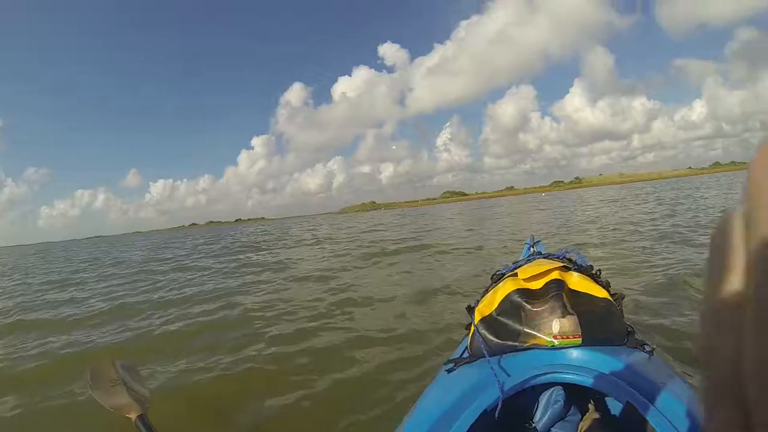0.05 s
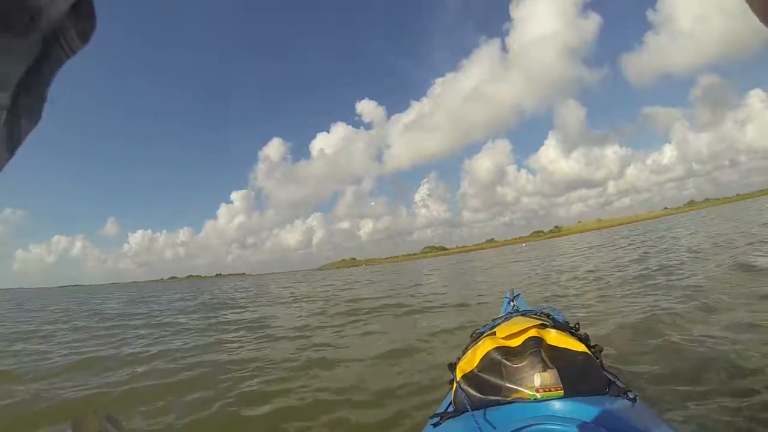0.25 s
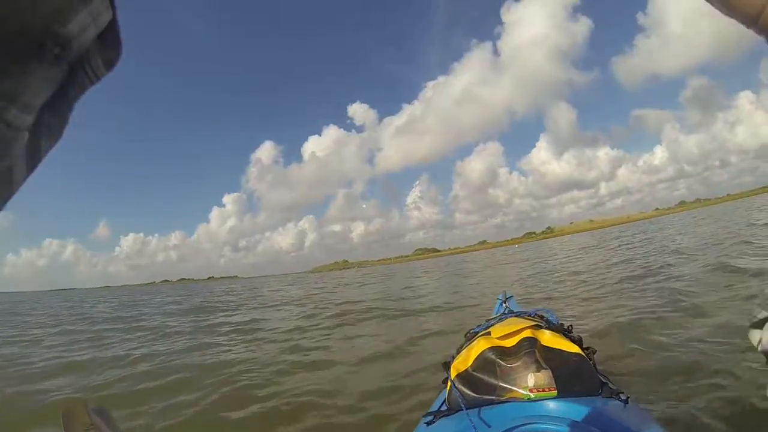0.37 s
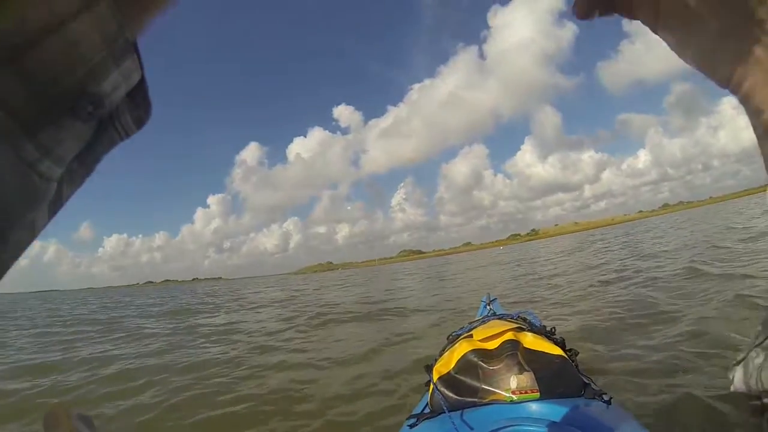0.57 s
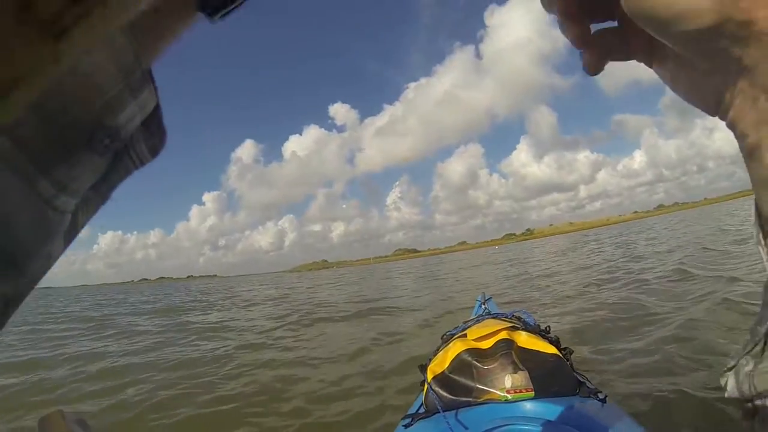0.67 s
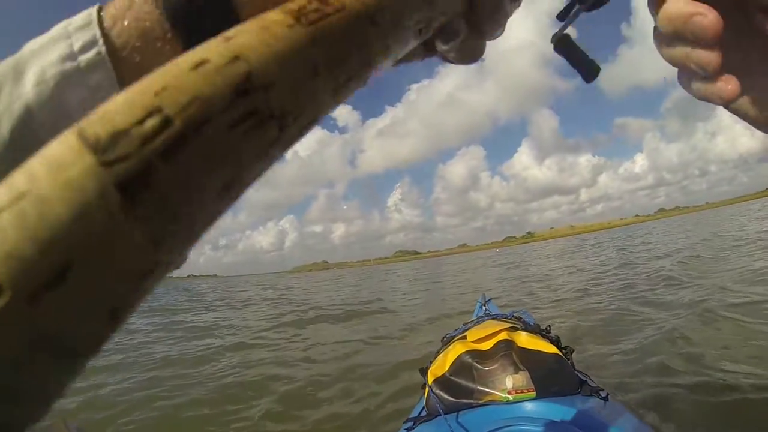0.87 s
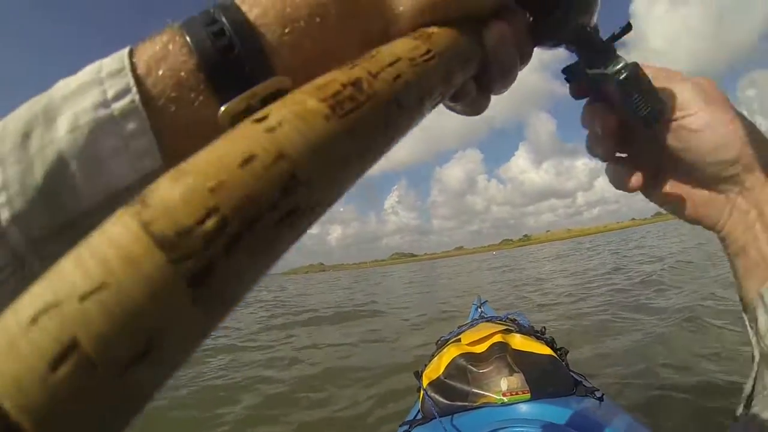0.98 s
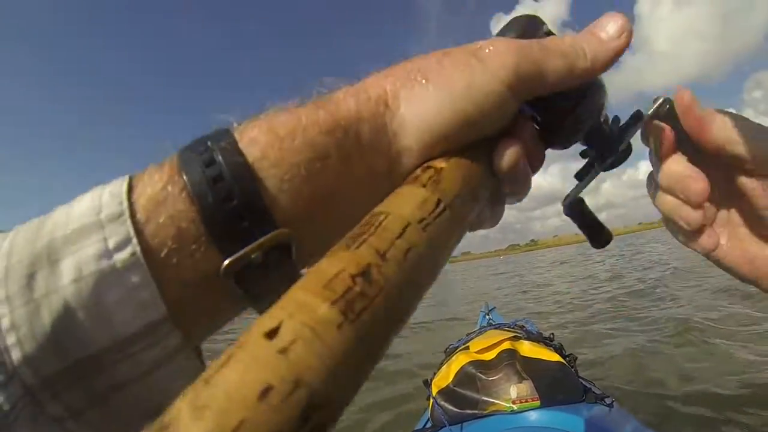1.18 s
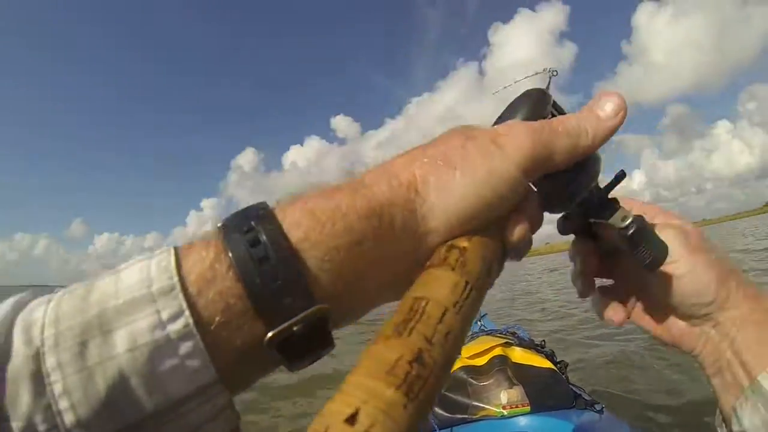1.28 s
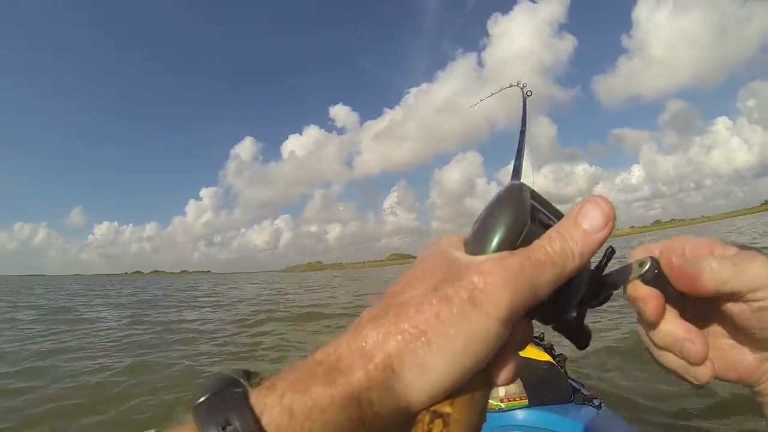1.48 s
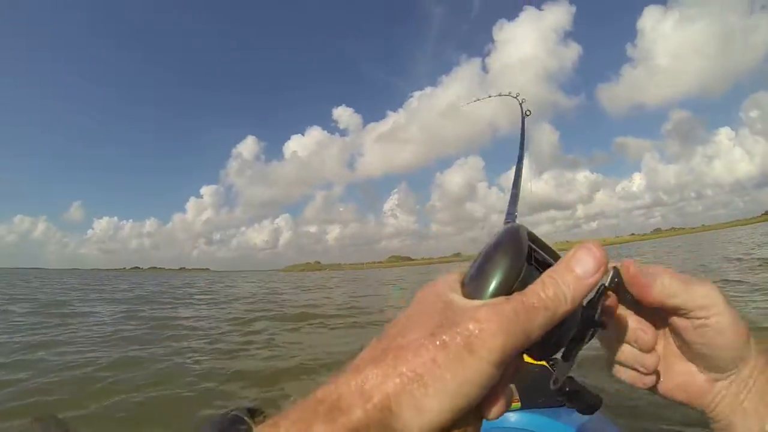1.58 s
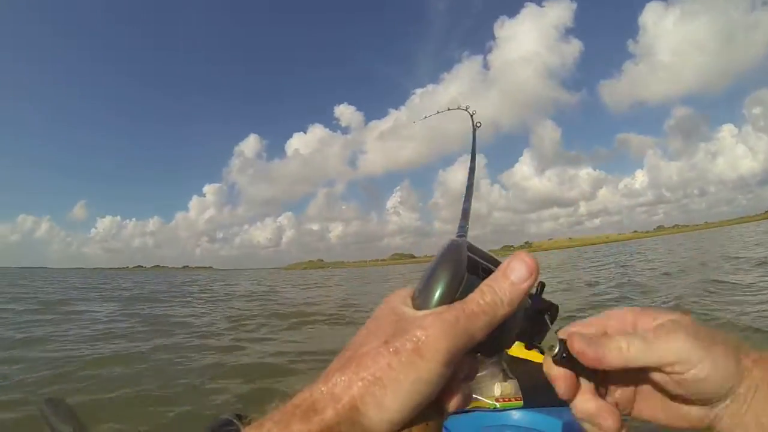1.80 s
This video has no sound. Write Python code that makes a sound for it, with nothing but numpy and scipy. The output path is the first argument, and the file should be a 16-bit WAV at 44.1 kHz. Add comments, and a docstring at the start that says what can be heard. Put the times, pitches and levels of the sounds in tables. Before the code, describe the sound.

Fishing gear knocks hard against the microphone, followed by small clicks and soft rubbing.

```python
"""Gear knocks hard on a plastic camera case as an angler in a kayak sweeps a rod back to start reeling.
The camera, worn on the chest, shakes on its mount; the gear scrapes off, leaving a faint metallic ring.
Small clicks and ticks follow. Then sleeve and rod butt rub by the case with each turn of the reel.
Underneath sit dull low thuds, low wind and a gentle wash of water."""
import sys
import numpy as np
from scipy import signal
from scipy.fft import rfft, irfft
from scipy.io import wavfile
from scipy.ndimage import uniform_filter1d

SR = 44100
rng = np.random.default_rng(int(sys.argv[2]) if len(sys.argv) > 2 else 0)


def store_pcm(level_fs):
    """Save levels as 16-bit WAV."""
    pcm = np.round(np.clip(level_fs, -1, 1) * 32767).astype(np.int16)
    wavfile.write(sys.argv[1], SR, np.atleast_2d(pcm).T)


N = 81585


def amp(db):
    """Decibels to gain."""
    return 10 ** (np.asarray(db) / 20)


def unit(x):
    """Scales to rms 1."""
    return x / np.sqrt(np.mean(x ** 2) + 1e-20)


def clock():
    """Time of every sample in seconds."""
    return np.arange(N) / SR


def noise():
    """Fresh white noise, as long as the scene."""
    return rng.standard_normal(N)


def add(mix, start_s, sound):
    """Drops a sound into the mix at start_s."""
    part = mix[max(round(start_s * SR), 0):][:len(sound)]
    part += sound[:len(part)]


def colour(x, eq):
    """Shapes x with an EQ curve of (Hz, dB) points, at rms 1."""
    hz, db = np.transpose(eq)
    bins_hz = np.fft.rfftfreq(N, 1 / SR)
    gain = amp(np.interp(np.log(bins_hz + 1), np.log(hz), db))
    return unit(irfft(rfft(x) * gain, N))


def steady(x, samples):
    """Levels out swells longer than the given window and keeps the finer grain."""
    return unit(x / np.sqrt(uniform_filter1d(x ** 2, samples) + 1e-6))


def ring(modes, attack_s):
    """A struck body: decaying sines, each (Hz, dB, seconds to fall 60 dB), with a soft attack."""
    longest_s = max(t60 for _, _, t60 in modes)
    t = np.arange(int(1.3 * SR * longest_s)) / SR
    tone = sum(amp(db - 60 * t / t60) * np.sin(2 * np.pi * hz * t) for hz, db, t60 in modes)
    return (1 - np.exp(-t / attack_s)) * tone


def burst(peak_s):
    """A short envelope that reaches 1 at peak_s and dies away."""
    age = clock()[:2048] / peak_s
    return age * np.exp(1 - age)


def snap(hz, peak_s):
    """A very short burst of bright noise centred on hz."""
    eq = [(hz / 4, -20), (hz / 2, -10), (hz, 0), (hz * 2, -24), (hz * 4, -48)]
    envelope = burst(peak_s)
    return envelope * colour(noise(), eq)[:len(envelope)]


# The wind's fader ride. Each row: time in seconds, level in dB.
WIND_RIDE = [(.11, -24.5), (.3, -36.5), (.38, -42.5), (.56, -46.5), (.72, -41), (1.2, -36.5), (1.45, -35),
             (1.85, -31.5)]
# The wind's tone, nearly all bass. Each row: frequency in Hz, gain in dB.
WIND_EQ = [(10, 0), (20, 12), (38, 2.5), (70, -10), (120, -2), (175, -16), (262, -17.5), (400, -32),
           (2000, -83)]


def wind():
    """Wind rumbles on the camera; the background drops after the knock and slowly rises again."""
    level_db = np.interp(clock(), *np.transpose(WIND_RIDE))
    return amp(level_db) * steady(colour(noise(), WIND_EQ), samples=2200)


# The water's midrange wash and the fine hiss above it. Each row: frequency in Hz, gain in dB.
WASH_EQ = [(150, -40), (400, -6.5), (540, -2.5), (900, 3), (1110, -4), (1310, -0.5), (1980, -2.5),
           (2200, -6), (3400, -10), (4180, -21.5), (5080, -14.5), (6000, -34), (15000, -79)]
HISS_EQ = [(1000, -33.5), (5000, -4), (7000, -4.5), (14200, -14)]


def water():
    """A wavering wash of water and a faint hiss start low and reach full level at 0.8 s."""
    dip = np.interp(clock(), [KNOCK_AT_S, 0.8], [1, 0])
    waver_db = 3 * unit(uniform_filter1d(noise(), size=900))
    wash = amp(-60.5 - 6.5 * dip + waver_db) * colour(noise(), WASH_EQ)
    hiss = amp(-76 - 14.5 * dip) * colour(noise(), HISS_EQ)
    return wash + hiss


# Low thuds; the first prolongs the mount's shake. Each row: start in seconds, level in dB, pitch in Hz.
THUD_CUES = [(0.163, -6.5, 45.1), (.688, -28, 157.2), (1.069, -19, 114.4), (1.347, -43.5, 111),
             (1.491, -13, 27.9), (1.53, -15, 36.8), (1.557, -17.5, 109.7), (1.738, -25, 124)]


def thuds():
    """The camera shakes on its mount after the knock, then soft bumps follow as the angler shifts."""
    out, decay_s = np.zeros(N), 0.11
    for start, db, hz in THUD_CUES:
        add(out, start, ring([(hz, db, decay_s)], attack_s=0.00475))
    return out


def sleeve():
    """Cloth brushes the case in one soft, dull swell during the rub near 1.05 s."""
    peak_s, width_s, centre_hz = 1.052, 0.013, 440
    octave = [centre_hz / np.sqrt(2), centre_hz * np.sqrt(2)]
    rush = signal.sosfilt(signal.butter(2, octave, "band", fs=SR, output="sos"), noise())
    swell = np.exp(-((clock() - peak_s) / width_s) ** 2)
    return amp(-45) * swell * unit(rush)


# Bright ticks of tackle. Each row: start in seconds, level in dB, centre frequency in Hz.
TICK_CUES = [(0.2299, -44, 9400), (0.2336, -42.5, 7800), (.4877, -56.5, 4600), (0.4921, -60.5, 5100),
             (0.6817, -57.5, 5700)]


def ticks():
    """Small hard parts of the tackle touch with a thin tick."""
    out = np.zeros(N)
    for start, db, hz in TICK_CUES:
        add(out, start, amp(db) * snap(hz, peak_s=0.00075))
    return out


# The ring of the plastic case. Each row: frequency in Hz, relative level in dB, seconds to fall 60 dB.
CASE_RING = [(278.5, -4, 0.048), (807, -18.5, 0.15), (974, -0.5, 0.024), (1380, -10, 0.027),
             (1585, -1, 0.021), (1980, -5.5, 0.027), (2497, -11, 0.019), (2960, -15, 0.0091),
             (3820, -22, 0.039), (4560, -20.5, 0.028), (4940, -16.5, 0.016), (9400, -37, 0.0045)]
# The crunch on a click's attack. Each row: frequency in Hz, gain in dB.
CRUNCH_EQ = [(400, 6), (900, 9.5), (2500, 2), (6000, -28), (14000, -26)]
# Gear tapping the case. Each row: start in seconds, level in dB, lowest-mode trim in dB, treble in dB.
CLICK_CUES = [(.2303, -33, 6.5, 11), (.2338, -29.5, 11, 17), (.3387, -34.5, -0.5, 9), (.3508, -43.5, 5, -1),
              (.5999, -44.5, -8, -7), (.8632, -50, -11, -2), (.8883, -40, -27, -23), (1.1755, -46, -8, -17),
              (1.066, -32, -3, -15), (1.0985, -32, -9, -12), (1.364, -30.5, -3, -15),
              (1.4655, -35.5, 4, -15), (1.4864, -42, -18, -22), (1.5395, -40, 9, -26),
              (1.7688, -35.5, -2.5, -28)]


def clicks():
    """Light contacts crunch briefly and ring the case, each with its own weight and brightness."""
    shelf_hz, crunch_db = 5800, -8
    out, envelope = np.zeros(N), burst(peak_s=0.00069)
    grit = colour(noise(), CRUNCH_EQ)
    for n, (start, db, low_db, treble_db) in enumerate(CLICK_CUES):
        modes = []
        for k, (hz, mode_db, t60) in enumerate(CASE_RING):
            trim_db = low_db * (k == 0) + treble_db / (1 + (shelf_hz / hz) ** 4)
            modes.append((hz, mode_db + trim_db, t60))
        crunch = envelope * grit[n * len(envelope):][:len(envelope)]
        add(out, start, amp(db) * ring(modes, attack_s=0.0002))
        add(out, start, amp(db + crunch_db) * crunch)
    return out


# Rubbing as it sounds through the case. Each row: frequency in Hz, gain in dB.
FRICTION_EQ = [(200, 5), (370, 6), (500, -4.5), (800, 1), (980, 4.5), (1120, -2.5), (1330, -1.5),
               (1480, -3), (1680, -1), (2000, -2), (2250, -12), (2600, -6.5), (2950, -15.5), (3400, -13.5),
               (3850, -14.5), (4200, -31), (4600, -21), (5300, -26.5), (5900, -40), (8200, -48),
               (9200, -35.5), (10000, -44.5), (15000, -64)]


def friction():
    """Dense tiny slips over a smooth hiss, catching unevenly and coloured by the case."""
    slips_per_s, spread_db, catch_db, catch_hz = 2500, 2, 2.2, 150
    strength = amp(spread_db * np.minimum(rng.exponential(1, N), 4))
    slips = strength * rng.choice([-1, 1], N) * (rng.random(N) < slips_per_s / SR)
    catches = unit(signal.sosfilt(signal.butter(2, catch_hz, fs=SR, output="sos"), noise()))
    scrape = amp(catch_db * catches) * (unit(slips) + 0.51 * noise())
    return steady(colour(scrape, FRICTION_EQ), samples=500)


# The low push that a rub gives the mount. Each row: frequency in Hz, gain in dB.
PUSH_EQ = [(10, -21.5), (22, 1.5), (42, 1), (70, -1), (116, 4.5), (170, -18.5), (270, -5), (350, -22.5),
           (520, -29), (1200, -100.5)]
# Strokes along the case. Each row: start, peak and end in seconds, peak level in dB,
# start and end levels in dB relative to the peak, bass trim in dB.
RUB_CUES = [(0.112, 0.144, 0.192, -27, -4, -14, -4), (0.545, 0.72, 0.8, -57, -9, -17, 4),
            (0.992, 1.07, 1.121, -40, -17, -5, 3), (1.25, 1.365, 1.414, -39, -16, -3, 2.5),
            (1.54, 1.578, 1.617, -30.5, -4.5, -8, -2), (1.695, 1.777, 1.795, -52, -5.5, -11, 7)]


def rubs():
    """Gear, sleeve and rod butt drag across the case, each stroke also pushing on the mount."""
    grain_fade_s, push_fade_s, push_db, curve = 0.0064, 0.0095, 9, 1.1
    out, t = np.zeros(N), clock()
    grain = friction()
    rumble = steady(colour(noise(), PUSH_EQ), samples=1100)
    for start, peak, end, db, start_db, end_db, bass_db in RUB_CUES:
        lead_in = np.interp(t, [start, peak], [1, 0]) ** curve
        tail = np.interp(t, [peak, end], [0, 1]) ** curve
        pressure = amp(db + start_db * lead_in + end_db * tail)
        outside_s = abs(t - np.clip(t, start, end))  # zero during the stroke
        scrape = np.exp(-outside_s / grain_fade_s) * grain
        push = amp(push_db + bass_db) * np.exp(-outside_s / push_fade_s) * rumble
        out += pressure * (scrape + push)
    return out


# The body of the knock; the two long, faint tails are a metal part.
# Each row: frequency in Hz, relative level in dB, seconds to fall 60 dB.
KNOCK_RING = [(1370, 0, 0.016), (1854, -6, 0.017), (2312, -3, 0.0086), (2510, -8, 0.0083),
              (3340, -4.5, 0.0064), (3730, -18.5, 0.011), (4877, -24, 0.011), (6450, -32, 0.0097),
              (1465, -64.5, 0.8), (3311, -54.5, 0.85)]
# The camera shaking on its mount. Each row: frequency in Hz, level in dB, seconds to fall 60 dB.
MOUNT_SHAKE = [(37.5, -6.5, 0.16), (124, -9.5, 0.17), (271, -21, 0.087), (388, -21, 0.088)]
# The hit and its rebounds. Each row: start in seconds, ring level in dB, bright crack level in dB.
KNOCK_CUES = [(0.1122, 1.5, -47), (0.1283, -13.5, -49), (0.1393, -14.5, -53.5), (0.148, -18.5, -57),
              (.1615, -20, -66), (0.17, -25, -59.5)]
KNOCK_AT_S = KNOCK_CUES[0][0]


def knock():
    """A hard blow and its rebounds crack and ring on the case; the first shoves and shakes the camera."""
    shove_db, shove_s = -14, 0.0065
    out = np.zeros(N)
    blow = ring(KNOCK_RING, attack_s=0.0012)
    for start, db, crack_db in KNOCK_CUES:
        add(out, start, amp(db) * blow)
        add(out, start, amp(crack_db) * snap(hz=8000, peak_s=0.0018))
    shove = np.sin(np.pi * np.minimum(clock() / shove_s, 1)) ** 2
    add(out, KNOCK_AT_S, ring(MOUNT_SHAKE, attack_s=0.0035))
    add(out, KNOCK_AT_S, amp(shove_db) * shove)
    return out


def scene():
    """All layers in mono, opening from silence with a quick fade into the knock."""
    fade_in = np.interp(clock(), [KNOCK_AT_S - 0.0064, KNOCK_AT_S], [0, 1])
    mix = knock() + clicks() + ticks() + sleeve() + rubs() + thuds() + water() + wind()
    return (fade_in * mix)[None]


def record(dry):
    """A steep high cut takes off the very top."""
    high_cut = signal.firwin(511, cutoff=14900, window=("kaiser", 9), fs=SR)
    return signal.oaconvolve(dry, high_cut[None], "same")


dry = scene()
out = record(dry)
store_pcm(out)
```